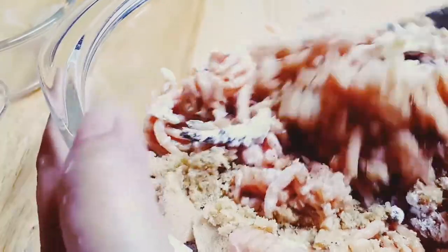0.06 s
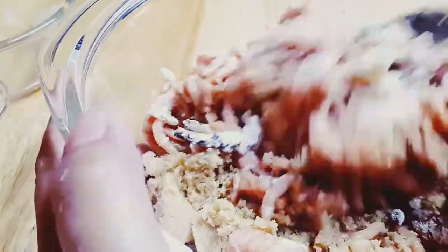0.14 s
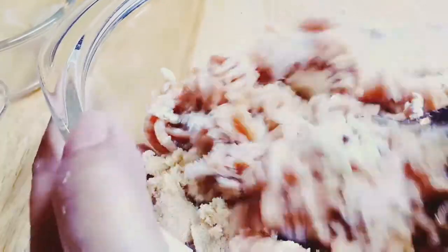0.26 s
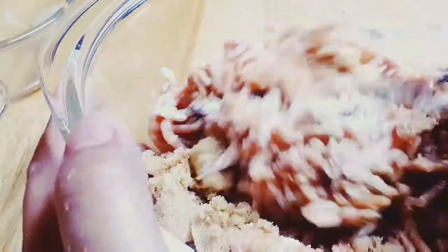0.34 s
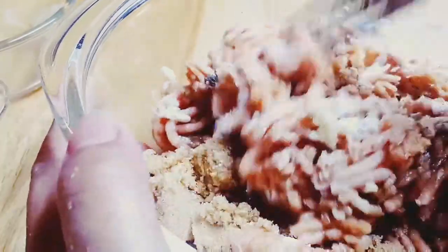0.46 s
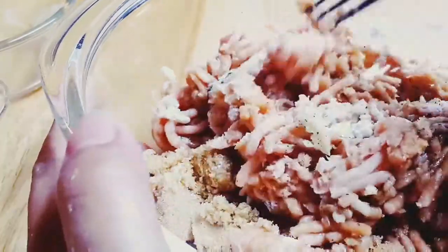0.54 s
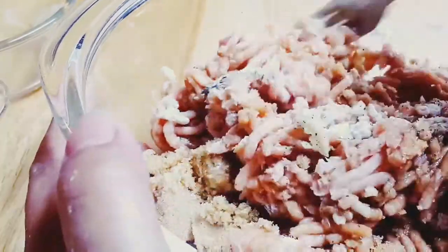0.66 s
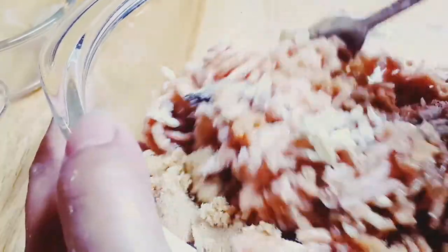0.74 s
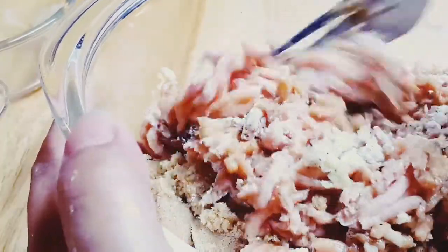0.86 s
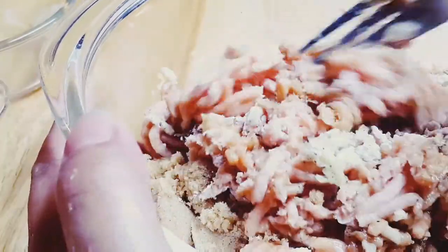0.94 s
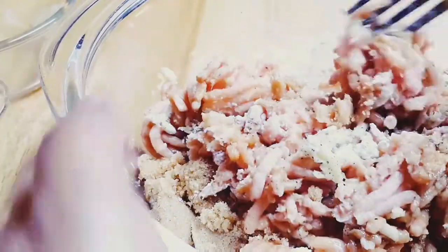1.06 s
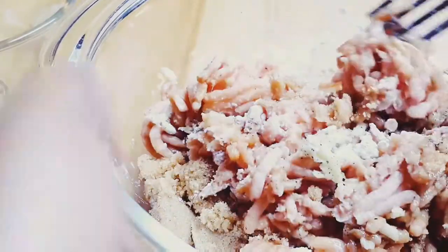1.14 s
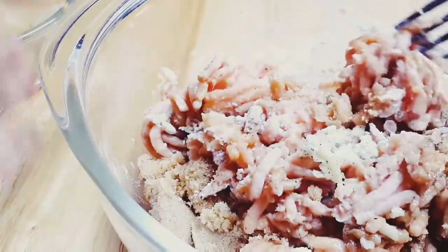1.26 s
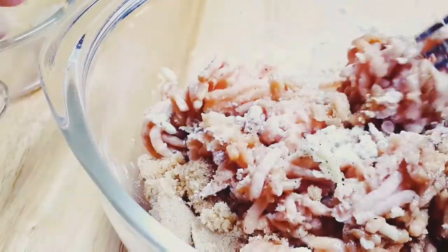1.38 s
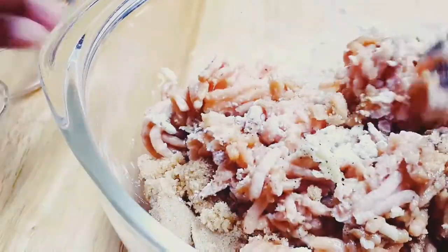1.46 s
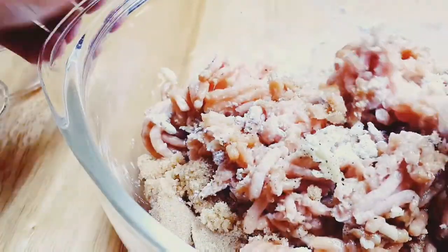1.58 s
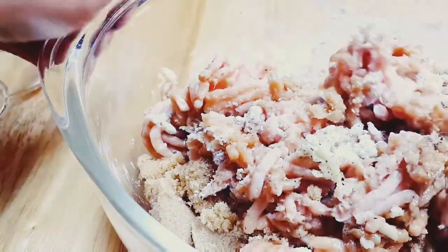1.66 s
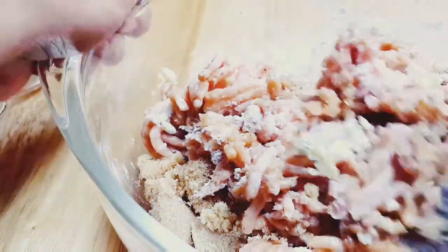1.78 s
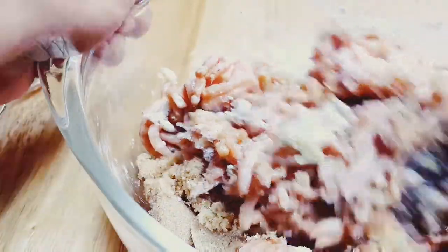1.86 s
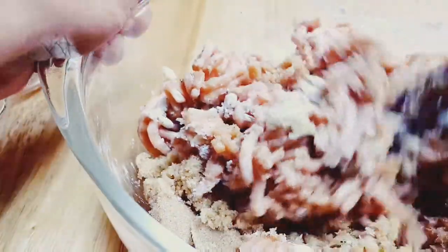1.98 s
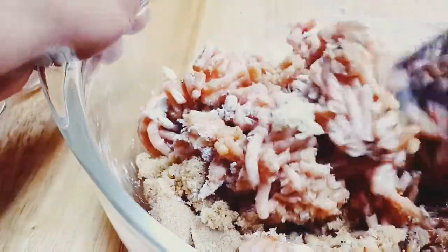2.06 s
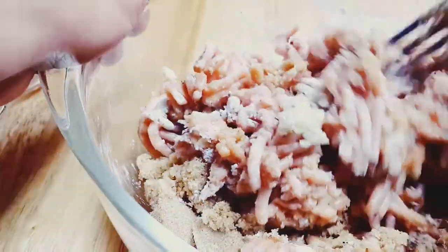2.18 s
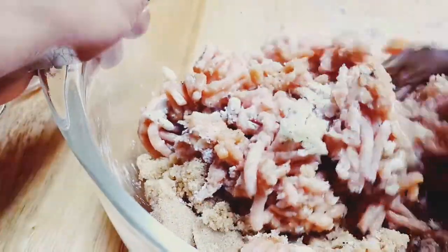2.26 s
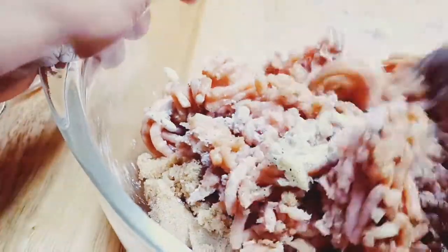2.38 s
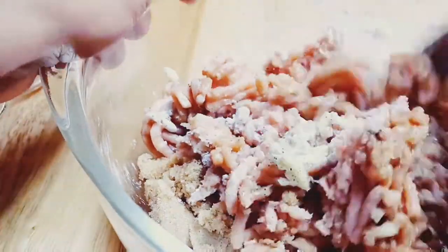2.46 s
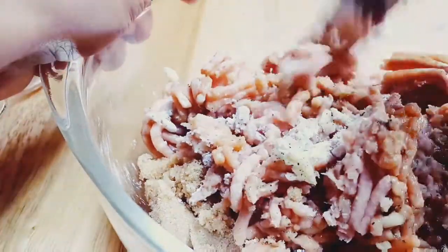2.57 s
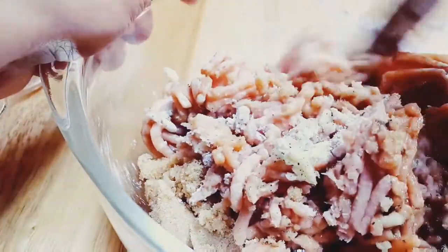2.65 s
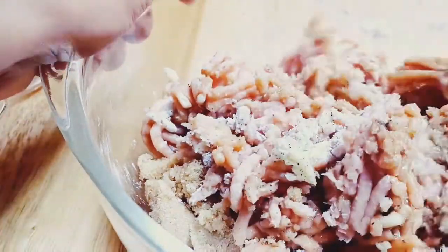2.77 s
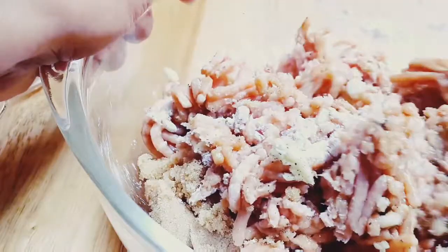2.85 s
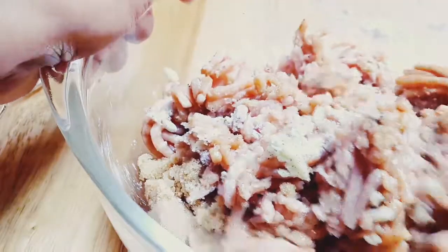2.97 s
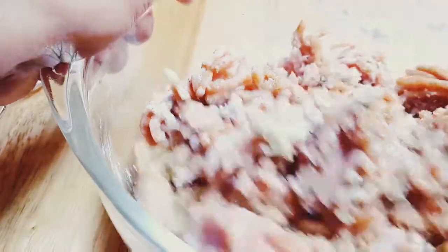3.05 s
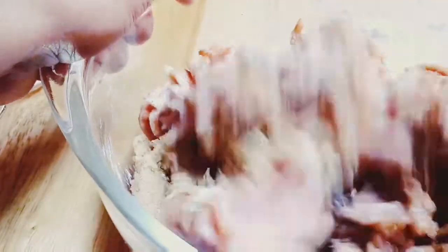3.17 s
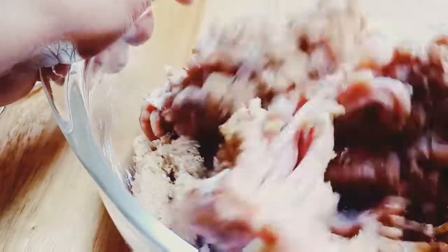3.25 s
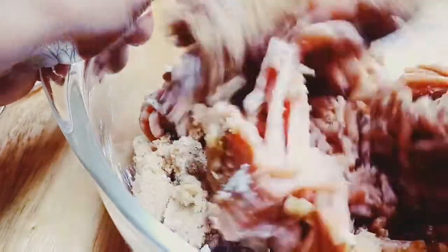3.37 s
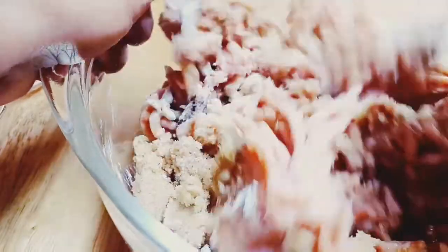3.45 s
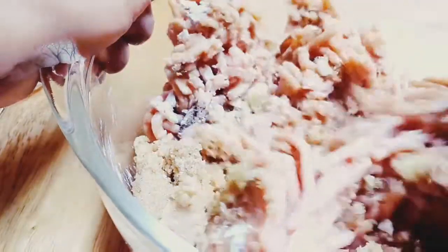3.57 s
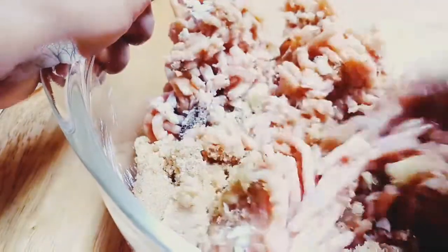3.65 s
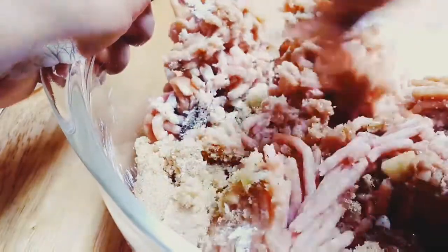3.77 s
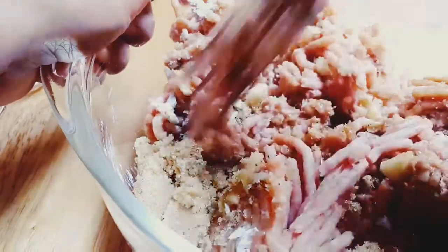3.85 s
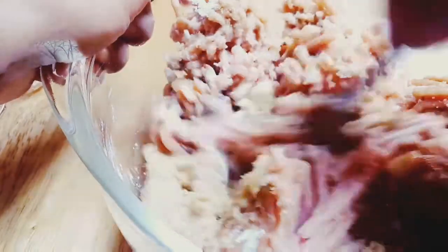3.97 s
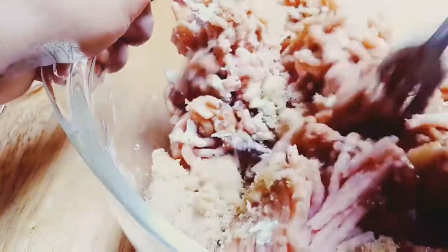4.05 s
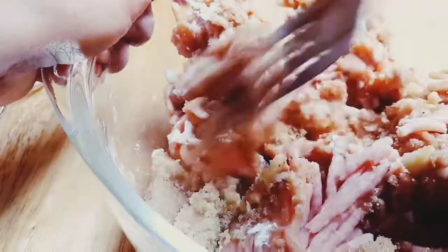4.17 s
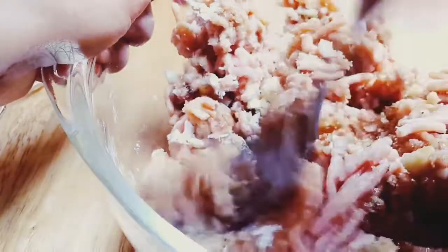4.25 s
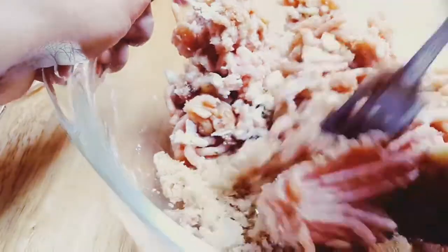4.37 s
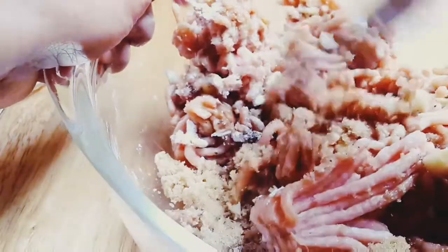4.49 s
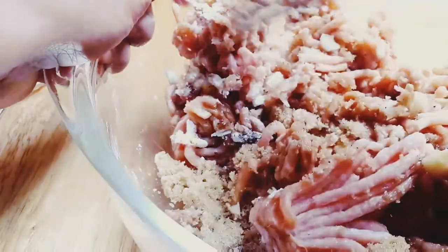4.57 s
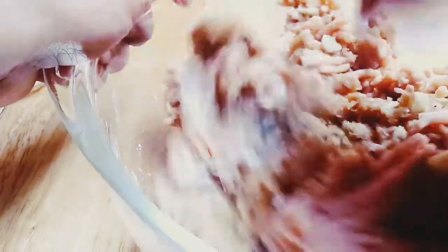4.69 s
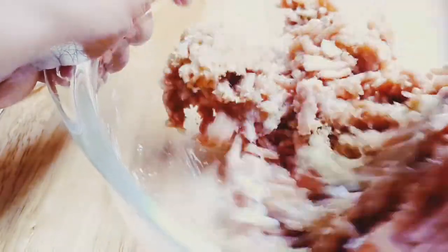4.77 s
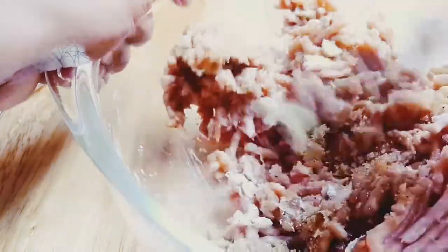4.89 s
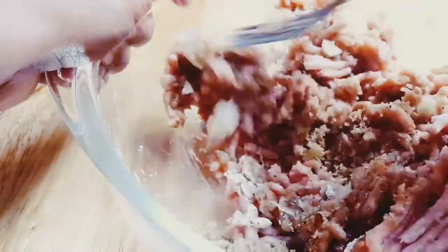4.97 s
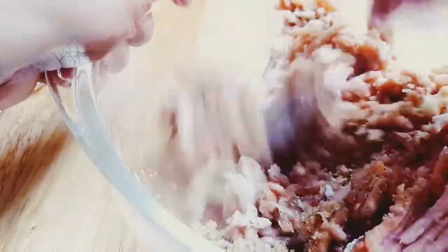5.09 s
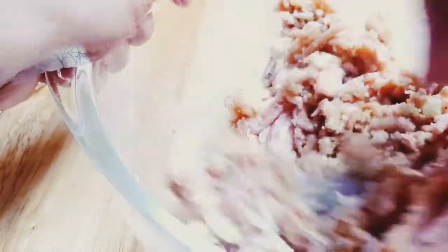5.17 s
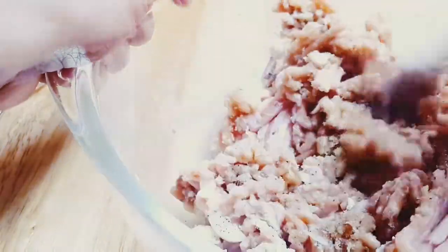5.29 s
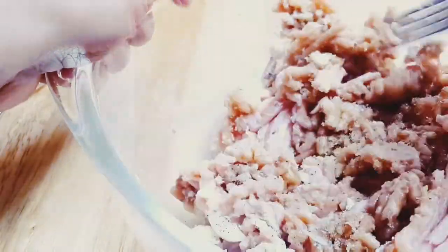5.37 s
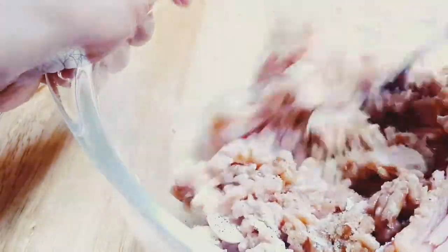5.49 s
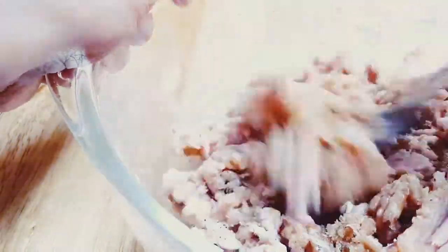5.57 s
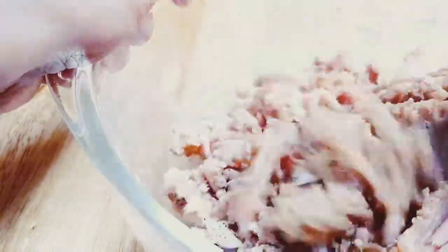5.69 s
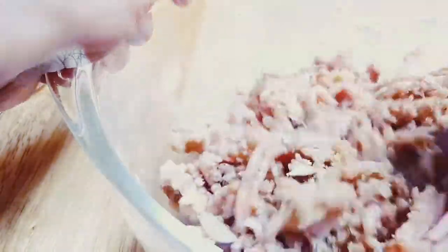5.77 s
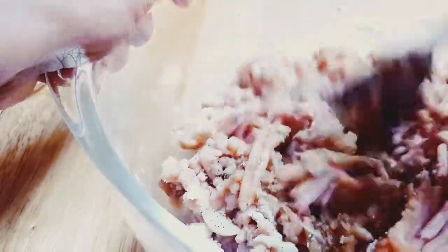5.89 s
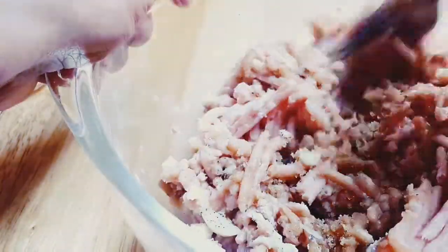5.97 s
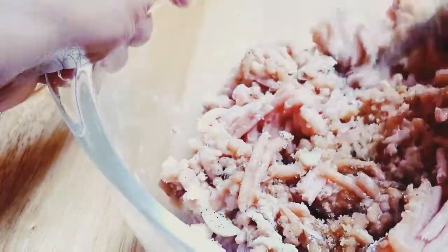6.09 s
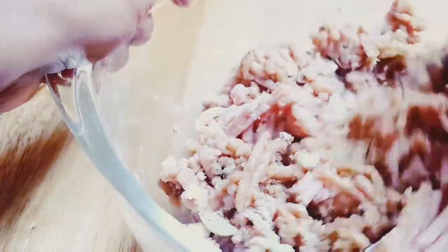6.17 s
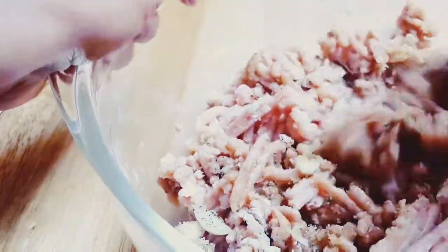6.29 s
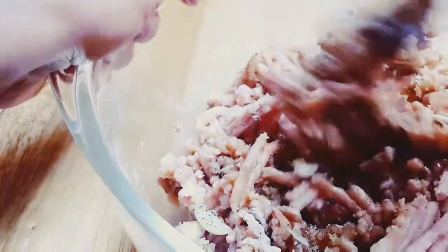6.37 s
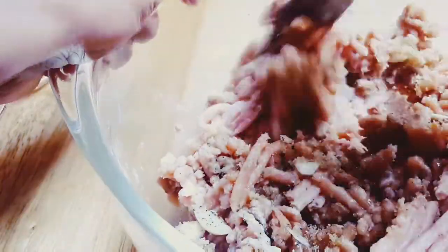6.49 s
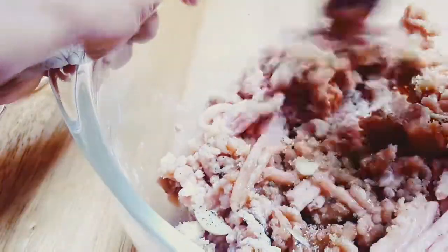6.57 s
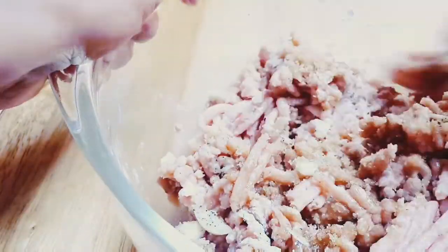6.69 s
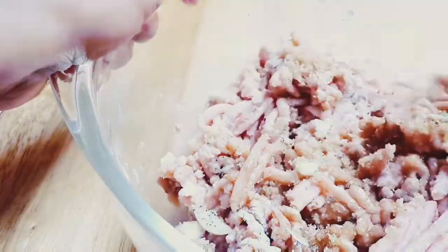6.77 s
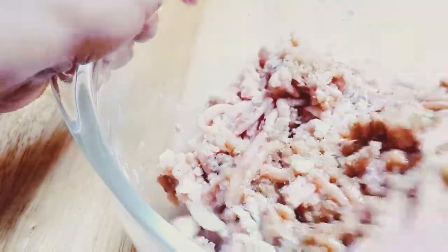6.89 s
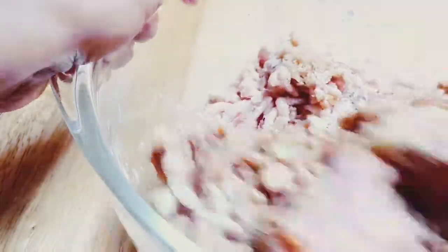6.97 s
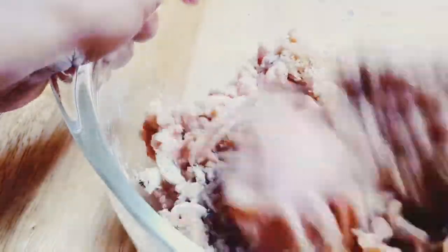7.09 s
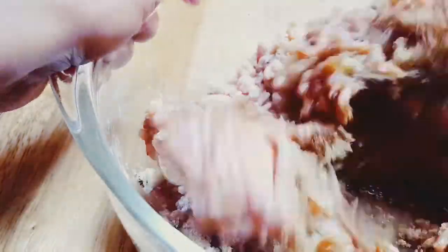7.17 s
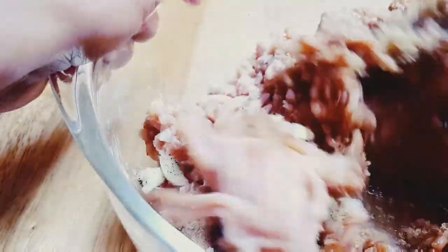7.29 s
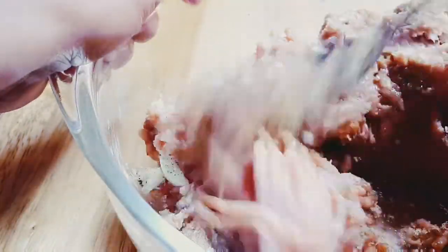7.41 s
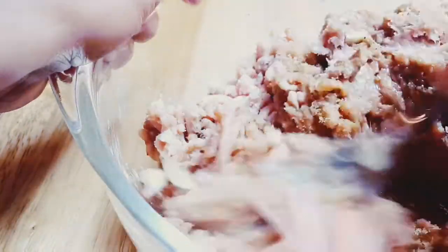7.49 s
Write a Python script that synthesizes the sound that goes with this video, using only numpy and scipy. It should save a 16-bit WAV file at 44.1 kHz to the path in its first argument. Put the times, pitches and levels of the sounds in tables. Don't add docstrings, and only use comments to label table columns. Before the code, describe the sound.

A fork turns wet ground meat in a glass bowl with crackling squelches and smacks, while the bowl knocks and drags on a wooden table.

```python
import sys
import numpy as np
from scipy import signal
from scipy.fft import rfft, irfft, next_fast_len
from scipy.io import wavfile
from scipy.ndimage import uniform_filter1d

SR = 44100
rng = np.random.default_rng(int(sys.argv[2]) if len(sys.argv) > 2 else 0)


def ratio_of_db(decibels):
    return 10 ** (np.asarray(decibels, float) / 20)


def wrap_up_sound(samples):
    columns = np.atleast_2d(samples).T
    tamed = np.clip(columns, -1, 1)
    steps = np.round(tamed * 32767).astype(np.int16)
    wavfile.write(sys.argv[1], SR, steps)


N = 332514

# (frequency [Hz], level [dB per Hz])
CRACKLE_SPECTRUM = [(2000, -12), (3500, -1.5), (5200, -4), (6500, 6), (7800, -4.5), (9500, -3),
                    (12000, -6.5), (15500, -14)]
# (multiple of the lowest mode [1], level [dB])
TABLE_MODES = [(1, 9), (1.37, 2.5), (1.75, 3), (2.1, -9), (2.6, -11)]
# (frequency [Hz], level [dB])
UPPER_MODES = [(570, 0), (780, 6.5), (1050, -2), (1300, 1)]


def in_time(rows):
    s, *columns = np.transpose(rows)
    return [np.interp(np.arange(N) / SR, s, c) for c in columns]


def at_hz(points, hz):
    points = np.array(points)
    return np.interp(np.log(hz), np.log(points[:, 0]), points[:, 1])


def rms_one(x):
    return x / np.sqrt(np.mean(x ** 2) + 1e-20)


def drift(rate):
    r = np.exp(-80 * np.pi * rate / SR)
    slow = signal.lfilter([1], [1, -2 * r, r * r], rng.standard_normal(N // 40 + 2002))[2000:]
    return np.interp(np.arange(N) / 40, np.arange(len(slow)), rms_one(slow))


def ring(clicks, hz, t60):
    r, w = ratio_of_db(-60 / (t60 * SR)), 2 * np.pi * hz / SR
    return signal.lfilter([0, np.sin(w)], [1, -2 * r * np.cos(w), r * r], clicks + 1e-18)


def colour(x, spectrum):
    size = next_fast_len(N)
    hz = np.maximum(np.arange(size // 2 + 1) * SR / size, 1)
    return irfft(rfft(x, size) * ratio_of_db(at_hz(spectrum, hz)), size)[..., :N]


def add(out, sound, s):
    i = round(s * SR)
    out[..., i:i + sound.shape[-1]] += sound[..., :N - i]


def strokes(rows):
    blow_db_per_s, ease_in_db_per_s, release_db_per_s = 2499, 451, 330.5
    t = np.arange(N) / SR
    level_db, loudest = np.full(N, -110.), np.zeros(N, int)
    for k, (s, length, db, growth_db, *_) in enumerate(rows):
        attack = blow_db_per_s if growth_db < 0 else ease_in_db_per_s
        now_db = db + growth_db * np.clip((t - s) / length, 0, 1)
        now_db = now_db - attack * np.maximum(s - t, 0)
        now_db = now_db - release_db_per_s * np.maximum(t - s - length, 0)
        loudest[now_db > level_db] = k
        level_db = np.maximum(level_db, now_db)
    return level_db, np.array(rows)[loudest, -1]


def grains(spectrum, low_hz, high_hz, per_s, spread_db, cycles, wet, patchy_db, count=16):
    sizes = ratio_of_db(spread_db * np.minimum(rng.exponential(1, (2, N)), 4)) * rng.choice([-1, 1], (2, N))
    born = rng.random((2, N)) < per_s * ratio_of_db(5.0 * drift(40)) / SR
    dealt, rustle, out = rng.integers(0, count, N), rng.standard_normal((2, N)), 0
    for k, hz in enumerate(np.geomspace(low_hz, high_hz, count)):
        near = np.abs(dealt - k) <= 1
        burst = rms_one(sizes * born * near) + wet * rustle
        burst = burst * ratio_of_db(patchy_db * drift(22))
        gain = (-1) ** k * ratio_of_db(at_hz(spectrum, hz)) * np.sqrt(hz)
        out = out + gain * rms_one(ring(burst, hz, cycles / hz))
    shared, apart = out
    late = np.roll(shared, round(.00015 * SR))
    return rms_one(np.array([shared + 0.468 * apart, late - 0.5 * apart]))


def squeezes(crackle_db):
    # (crest time [s], squelch level [dB], time to die by 20 dB [s])
    hollows = [(0.0, -23.5, 0.1), (0.078, -33, .13), (0.332, -43.5, 0.13), (0.72, -46, -0.24),
               (0.9, -53, 0.23), (1.184, -63, -0.3), (1.914, -48, 0.1), (2.066, -56, 0), (2.3, -63, .3),
               (2.369, -49, -0.5), (2.74, -57, .09), (3.03, -50.5, 1), (3.155, -46, 0), (3.56, -40, 0.06),
               (3.58, -41.5, 0.24), (4.102, -57, 0.7), (4.362, -47, 0.22), (4.854, -53, 0.05),
               (5.194, -54.5, 0.14), (5.528, -51, 0), (5.923, -46.5, 0.05), (6.176, -43, 0),
               (6.57, -54, -0.65), (6.722, -41, 0.44), (6.988, -40.5, -0.5), (7.112, -45.5, -0.4),
               (7.33, -64, -1), (7.54, -56, -0.24)]
    rise_share = 0.31
    t, level_db = np.arange(N) / SR, crackle_db - 21
    for s, db, dying in hollows:
        away = np.maximum((t - s) / dying, (s - t) / (rise_share * dying))
        level_db = np.maximum(level_db, db - 20 * away)
    return np.minimum(level_db, crackle_db + 11.5)


def all_smacks(crackle_db):
    # (time [s], peak level [dB], pitch [Hz])
    large = [(0.0555, -24, 4395), (0.1276, -26.5, 4370), (0.716, -33.5, 7820), (0.837, -39.5, 3460),
             (0.8908, -29, 6200), (1.1717, -33.5, 8600), (2.0663, -32, 3820), (2.147, -32.5, 7800),
             (2.173, -33, 8250), (2.3414, -25, 4470), (2.3401, -15.5, 7930), (2.4555, -32.5, 2540),
             (2.4875, -24.5, 5440), (2.747, -16.5, 7800), (2.9695, -26.5, 7700), (3.5667, -12.5, 6630),
             (3.5649, -19.5, 4060), (4.3535, -9, 7070), (5.4823, -40.5, 3150), (5.5635, -27.5, 7950),
             (6.1943, -21, 5140), (6.3355, -29, 8200), (6.7128, -25, 7740), (6.788, -28.5, 8300),
             (1.44, -54, 8950), (7.0878, -29.5, 8000), (7.208, -32.5, 5130), (7.3523, -27.5, 6370)]
    # (time [s], peak level [dB])
    strands = [(0.1014, -22), (0.2275, -31), (0.475, -36.5), (0.8468, -32.5), (2.256, -33), (2.332, -37),
               (2.7202, -39), (2.8883, -26.5), (2.9538, -42), (3.0131, -31), (3.1088, -28.5),
               (3.238, -29.5), (3.257, -23), (3.7183, -29.5), (4.347, -29), (4.7294, -38), (4.7553, -39),
               (4.786, -25.5), (5.1384, -43.5), (5.6021, -25.5), (5.7962, -44.5), (5.8698, -39.5),
               (6.0025, -35), (6.0664, -29), (6.1726, -29.5), (6.2359, -28), (6.357, -31), (6.3762, -25),
               (6.5248, -34.5), (6.98, -42)]
    snap_hz, pitch_spread = 6730, 0.037
    stray_gap_s, stray_over_db = .035, 9.5
    luck = rng.standard_normal((300, 3))
    stray_s = stray_gap_s * (np.arange(300) + .5 + .2 * np.clip(luck[:, 0], -2, 2))
    stray_s = stray_s[stray_s < N / SR]
    stray_db = crackle_db[(stray_s * SR).astype(int)] + stray_over_db
    stray_db = stray_db + 5 * np.clip(luck[:len(stray_s), 1], -2, 1)
    snaps = strands + list(zip(stray_s, stray_db))
    return large + [(s, db, snap_hz * (1 + pitch_spread * v)) for (s, db), v in zip(snaps, luck[:, 2])]


def smacks(rows):
    out, t = np.zeros((2, N)), np.arange(600) / SR
    draws = rng.standard_normal((len(rows), 2, 600))
    for (s, level_db, hz), noise in zip(rows, draws):
        spit = (noise[0] + 0.65 * noise[1] * [[1], [-1]]) * np.exp(-t / 0.0017)
        broad = 0.23 + 0.26 * ratio_of_db(level_db + 8.5)
        pitched = rms_one(ring(spit, hz, 13.9 / hz))
        crack = rms_one(signal.lfilter([1, 0, -1], [1, -.8, .3], spit))
        sound = 0.57 * pitched + broad * crack
        add(out, ratio_of_db(level_db) * sound / np.abs(sound.mean(axis=0)).max(), s)
    return out


def gulps():
    # (time [s], peak level [dB], pitch [Hz], length [s])
    pockets = [(0.079, -25.5, 2220, 0.0044), (0.712, -31.5, 1280, 0.016), (0.852, -40, 1380, 0.004),
               (0.888, -33.5, 1440, 0.0037), (2.452, -32, 2340, 0.0058), (3.019, -41, 1540, 0.024),
               (3.156, -30, 1480, 0.0079), (3.187, -40, 1420, 0.0099), (3.193, -35, 1490, 0.0035),
               (3.208, -35, 1370, 0.0063), (3.241, -37, 1500, 0.0099), (3.585, -24, 1420, 0.0065),
               (3.594, -24.5, 2680, 0.012), (3.606, -21, 2480, 0.014), (3.623, -27.5, 2050, 0.0099),
               (4.097, -44, 1520, 0.012), (6.189, -24.5, 1590, 0.0068), (6.306, -33.5, 777, 0.022),
               (6.68, -33, 710, 0.014), (6.714, -28.5, 1650, 0.018), (6.747, -28.5, 1660, 0.012),
               (6.787, -31.5, 2280, 0.035), (6.888, -34, 2214, 0.051), (6.937, -33, 775, 0.0089),
               (6.954, -25.5, 1486, 0.0136), (6.988, -35.5, 1380, 0.019), (7.101, -32.5, 1486, 0.0073)]
    out, t = np.zeros((2, N)), np.arange(3000) / SR
    draws = rng.standard_normal((len(pockets), 2, 3000))
    for (s, level_db, hz, length), noise in zip(pockets, draws):
        rush = noise[0] + 0.28 * noise[1] * [[1], [-1]]
        rush = rush * (1 - np.exp(-t / 0.0011)) * np.exp(-t / length)
        sound = ring(rush, hz, 26.0 / hz) + 0.48 * ring(rush, 1.532 * hz, 20.0 / hz)
        add(out, ratio_of_db(level_db - 4.5) * sound / np.abs(sound).max(), s)
    return out


def torn_meat(crackle_db, squelch_db):
    # (frequency [Hz], level [dB per Hz])
    squelch_spectrum = [(900, -15.5), (1400, 8), (1800, 1.5), (2300, 7.5), (2800, 9), (3400, -10.5)]
    # (frequency [Hz], level over the left [dB])
    right_tone = [(1000, -4.5), (2500, 3.5), (4500, 3), (6000, -6.5), (8000, 5.5), (11000, 4.5), (14000, 0)]
    crackle = grains(CRACKLE_SPECTRUM, 3000, 15350, 1800.0, 4.1, 7.4, 0.31, 2.48)
    squelch = grains(squelch_spectrum, 900, 3367, 1200.0, 4.1, 8.2, 1.0, 6.0)
    meat = ratio_of_db(crackle_db) * crackle + ratio_of_db(squelch_db - 5.5) * squelch
    meat = meat + smacks(all_smacks(crackle_db)) + gulps()
    meat[1] = colour(meat[1], right_tone)
    return meat


def glass():
    # (frequency [Hz], level [dB], t60 [s])
    bowl_modes = [(605, -36, .12), (1660, -37, .2), (2720, -42, .15), (2900, -42, .1), (5800, -44, .08),
                  (4270, -38, .07), (6560, -36, .09), (6720, -34, .12), (6900, -37, .09), (7680, -34, .06)]
    # (time [s], peak level [dB], splash level [dB], splash t60 [s], ringing [dB])
    slaps = [
        (2.3392, -16, -22.5, 0.11, 0),
        (2.7492, -20, -35, 0.115, 4),
        (3.5643, -10, -31, 0.184, -3),
        (4.353, -6, -34, 0.25, 8.5),
        (6.1712, -17, -35.5, 0.29, 2.5),
    ]
    # (start [s], length [s], ring level [dB], growth [dB], higher ring over it [dB])
    rubs = [
        (0.12, 0.046, -43.5, -28, -8),
        (0.32, 0.12, -52.5, -7, -1.5),
        (1.04, 0.15, -73, -8.5, -11),
        (1.85, 0.13, -62, 4, -15),
    ]
    taps, out = np.array(slaps), np.zeros((2, N))
    for hz, level_db, t60 in bowl_modes:
        clicks = np.zeros(N)
        luck_db = rng.normal(0, 2.5, len(taps))
        clicks[(taps[:, 0] * SR).astype(int)] = ratio_of_db(taps[:, 1] + taps[:, 4] + level_db + luck_db)
        out += ring(clicks, hz, t60) * ratio_of_db(rng.normal(0, 2, (2, 1)))
    splash, t = np.zeros(N), np.arange(SR // 2) / SR
    for s, level_db, splash_db, t60, _ in slaps:
        add(splash, ratio_of_db(level_db + splash_db - 60 * t / t60), s)
    out += splash * rms_one(colour(rng.standard_normal((2, N)), CRACKLE_SPECTRUM))
    rub_db, over_db = strokes(rubs)
    high_db = rub_db + over_db
    levels = [rub_db - 6, rub_db, high_db, high_db - 13.5, rub_db + over_db / 2 - 5.5]
    for (hz, _, t60), level_db in zip(bowl_modes[:5], levels):
        out += ratio_of_db(level_db) * rms_one(ring(rng.standard_normal(N), hz, 1.3 * t60))
    return out


def knocks():
    # (time [s], peak level [dB], upper wood [dB], t60 [s], lowest mode [Hz])
    hits = [(0.04, -31.5, -3, 0.1, 174), (0.352, -28, -10, 0.08, 197), (0.717, -25, -15, 0.084, 194.5),
            (0.738, -22, -8.5, 0.1, 266), (1.054, -46, -7, 0.11, 196), (1.855, -41.5, -2, 0.38, 190.7),
            (2.068, -25, 4, 0.062, 239), (2.339, -19.5, -27, 0.033, 204), (2.402, -30.5, -1, 0.12, 249.4),
            (2.523, -34, -11.5, 0.056, 203), (2.747, -9, -12.5, 0.068, 208.6),
            (2.863, -32, -19.5, 0.24, 185.3), (3.564, -27, -28.5, 0.0834, 208.3),
            (4.261, -45.5, 2.5, 0.22, 223), (4.353, -13, 4, 0.14, 220.1), (4.39, -20, -1.5, 0.16, 198.3),
            (4.786, -31, -5, 0.089, 217), (4.84, -15, -6, 0.0896, 238), (5.178, -51.5, -23, 0.14, 186),
            (6.172, -21.5, -9.5, 0.056, 188), (6.656, -28.5, -9, 0.087, 208), (6.83, -35, -2, 0.097, 243)]
    out, push, t = np.zeros(N), np.zeros(9000), np.arange(9000) / SR
    push[:20] = np.hanning(20) / 10
    draws = rng.standard_normal((len(hits), 2, len(TABLE_MODES) + len(UPPER_MODES)))
    puff_band = signal.butter(1, [300, 1200], "band", fs=SR, output="sos")
    puffs = signal.sosfilt(puff_band, rng.standard_normal((len(hits), 9000)))
    for (s, level_db, upper_db, t60, low_hz), (luck, shift), puff in zip(hits, draws, puffs):
        luck_db, detune = 3 * luck, .06 * shift
        modes = [(k * low_hz, db) for k, db in TABLE_MODES]
        modes = modes + [(hz, db + upper_db) for hz, db in UPPER_MODES]
        sound = sum(ratio_of_db(db + u) * ring(push, hz * (1 + v), t60 * (250 / hz) ** 0.7)
                    for (hz, db), u, v in zip(modes, luck_db, detune))
        sound = sound + puff * ratio_of_db(upper_db + 8.5 - 60 * t / (1.3 * t60))
        add(out, ratio_of_db(level_db) * sound / np.abs(sound).max(), s)
    return out


def drag(stir_db):
    # (start [s], length [s], low level [dB], growth [dB], upper over low [dB])
    drags = [
        (0.1, 0.33, -63, 16.5, -9),
        (0.78, .07, -52, -20, -26),
        (0.85, 0.21, -65, -2, -10.5),
        (1.85, .15, -61.5, 17, -6),
        (2.8, 0.099, -41, -0.5, -19),
        (3.1, 0.26, -81, 13, -17),
        (5.8, .05, -66, 1, -16),
        (6.2, 0.24, -46, -14.5, -6.5),
        (6.66, 0.31, -43, -7.5, -8.5),
    ]
    # (time [s], level [dB], pitch [Hz])
    moan_curve = [
        (0.056, -120, 211),
        (0.06, -64, 211),
        (0.122, -57, 231.9),
        (0.184, -57.5, 201.5),
        (0.2, -72.5, 202),
        (0.206, -120, 200.6),
    ]
    low_db, over_db = strokes(drags)
    upper_db = low_db + over_db
    slips = rng.standard_normal(N) * (rng.random(N) < 600.0 / SR) * ratio_of_db(2.0 * drift(30))
    low = ring(slips, 195, .12) + .7 * ring(slips, 225, .08) + .3 * ring(slips, 270, .05)
    table_hz = 211
    upper = sum(ratio_of_db(db) * ring(slips, k * table_hz, 0.12) for k, db in TABLE_MODES[1:])
    upper = upper + ratio_of_db(3) * sum(ratio_of_db(db) * ring(slips, hz, 0.017) for hz, db in UPPER_MODES)
    moan_db, moan_hz = in_time(moan_curve)
    moan = ratio_of_db(moan_db + 13.5) * np.sin(2 * np.pi * np.cumsum(moan_hz) / SR)
    low_gain = ratio_of_db(low_db - 3.5) + ratio_of_db(-69.5 + .5 * (stir_db + 59.5))
    return low_gain * rms_one(low) + ratio_of_db(upper_db) * rms_one(upper) + moan


def arm_rumble(squelch_db, wood):
    air_spectrum = [(15, -1.0), (30, -1.5), (100, 6.0), (140, -4.5), (300, -27.0)]      # (Hz, dB per Hz)
    air = rms_one(colour(rng.standard_normal((2, N)), air_spectrum))
    stir_db = uniform_filter1d(squelch_db, size=1500)
    air = air * ratio_of_db(-75.0 + .5 * (stir_db + 57.5) + 5.1 * drift(11))
    jolts = signal.sosfilt(signal.butter(2, 70, fs=SR, output="sos"), wood)
    return air + ratio_of_db(-25) * jolts * [[1], [-.6]]


def kitchen(x):
    t60, wall_cut_hz = 0.21, 15200
    t = np.arange(SR // 2) / SR
    echoes = rng.standard_normal((2, len(t))) * ratio_of_db(-60 * t / t60) * (t > .002)
    echoes = signal.sosfilt(signal.butter(1, wall_cut_hz, fs=SR, output="sos"), echoes)
    echoes = echoes / np.sqrt(np.sum(echoes ** 2, axis=1, keepdims=True))
    return signal.fftconvolve(x[None], echoes, axes=1)[:, :N]


def appliance():
    # (time [s], level [dB])
    hum_curve = [
        (0.0, -63.5),
        (1.87, -77.5),
        (2.06, -67.5),
        (3.32, -67),
        (4.83, -76),
        (6.95, -63.5),
        (7.54, -70),
    ]
    # (frequency [Hz], level [dB])
    whines = [(239.8, -87.5), (359.7, -81), (6995, -86.5), (9345, -93)]
    # (frequency [Hz], level [dB per Hz])
    hiss_spectrum = [(20, -0.5), (60, -5.5), (150, 1.5), (300, 3.5), (700, -3), (2000, -7), (7000, -8.5),
                     (16000, -11.5)]
    t, (hum_db,) = np.arange(N) / SR, in_time(hum_curve)
    hum = np.sqrt(2) * ratio_of_db(hum_db + .8 * drift(6)) * np.sin(2 * np.pi * 119.8 * t)
    lines = sum(ratio_of_db(db) * np.sin(2 * np.pi * hz * t + 0.93 * drift(13)) for hz, db in whines)
    hiss = ratio_of_db(-71) * rms_one(colour(rng.standard_normal((2, N)), hiss_spectrum))
    return hum + lines + hiss


def scene():
    # (start [s], length [s], crackle level at the start [dB], growth [dB])
    fork_strokes = [(0.0, 0.1, -50.5, 10), (0.08, 0.41, -44, -12), (0.72, 0.12, -43.5, -19.5),
                    (0.78, 0.15, -55.5, 7.5), (1.05, 0.12, -69.5, 9), (1.87, 0.181, -59.5, 2.5),
                    (2.066, .055, -52.5, -15), (2.14, 0.14, -60.5, 5.5), (2.36, 0.14, -53.5, 8.5),
                    (2.704, 0.079, -53.5, -4), (2.8, .32, -48, 3.5), (3.155, .126, -53, 10),
                    (3.31, 0.13, -59.5, 1.5), (3.49, 0.059, -61.5, 18.5), (3.572, 0.17, -38.5, -20),
                    (3.99, 0.1334, -59, 8.5), (4.1, 0.08, -52, -15), (4.362, 0.13, -42.5, -12),
                    (4.722, .19, -53.5, -7.5), (5.1, 0.0898, -62.5, 12), (5.2, 0.15, -52, -9),
                    (5.46, 0.1995, -57, 12), (5.8, 0.29, -62, 17.5), (6.176, 0.1964, -41.5, -1.5),
                    (6.47, 0.083, -62.5, 17), (6.57, 0.46, -44, 0.5), (7.09, 0.11, -45.5, 0),
                    (7.3, 0.069, -56.5, -1.5), (7.5, .04, -68, 12)]
    crackle_db = strokes(fork_strokes)[0]
    squelch_db = squeezes(crackle_db)
    bowl = torn_meat(crackle_db, squelch_db) + glass()
    wood = knocks() + drag(squelch_db)
    upper_wood = signal.sosfilt(signal.butter(2, 400, "high", fs=SR, output="sos"), wood)
    close = bowl + wood + ratio_of_db(-7) * kitchen(bowl[0]) + ratio_of_db(-4.5) * kitchen(upper_wood)
    close = signal.sosfilt(signal.butter(6, 170.4, "high", fs=SR, output="sos"), close)
    return close + arm_rumble(squelch_db, wood) + appliance()


def band_limit(x):
    return signal.sosfilt(signal.butter(12, 16960, fs=SR, output="sos"), x)


def record(dry):
    top_hz = 15900
    cut = signal.sosfilt(signal.cheby2(10, 50, 1.04 * top_hz, fs=SR, output="sos"), dry)
    return band_limit(cut)


dry = scene()
out = record(dry)
wrap_up_sound(out)
```